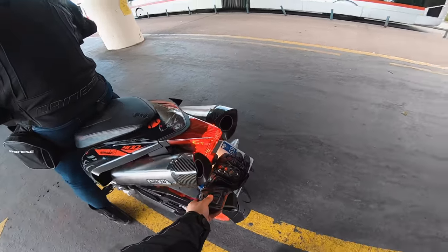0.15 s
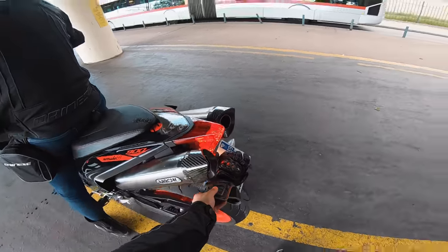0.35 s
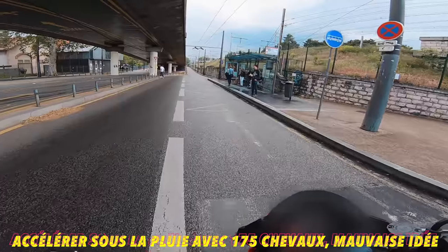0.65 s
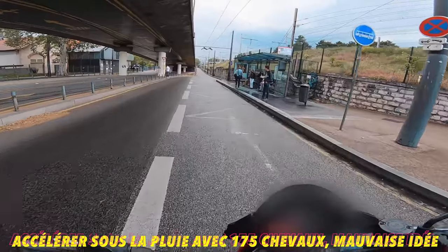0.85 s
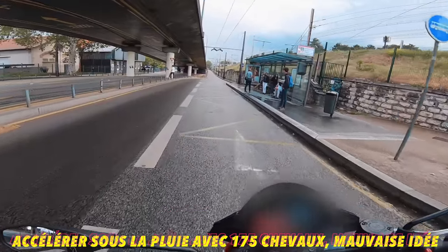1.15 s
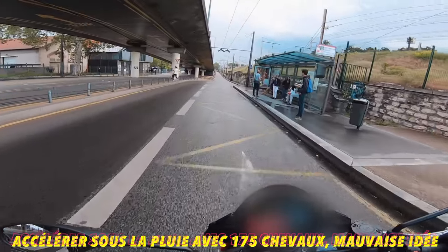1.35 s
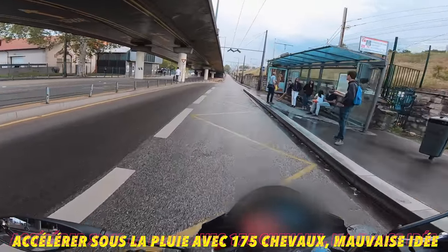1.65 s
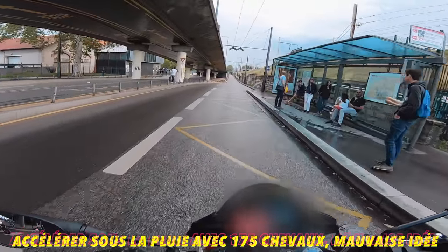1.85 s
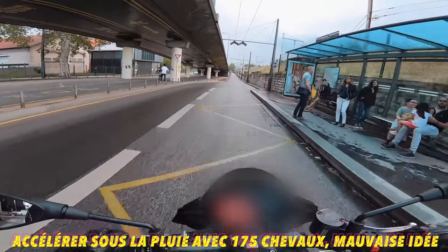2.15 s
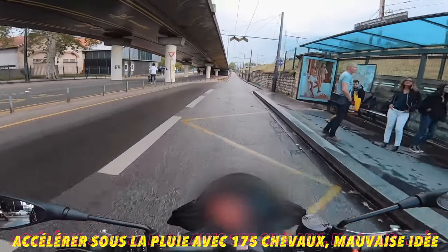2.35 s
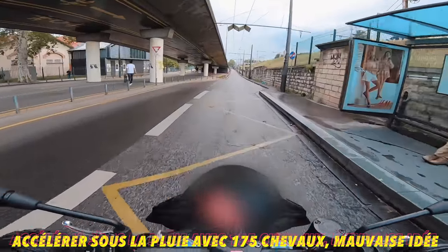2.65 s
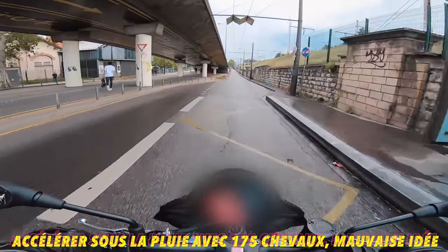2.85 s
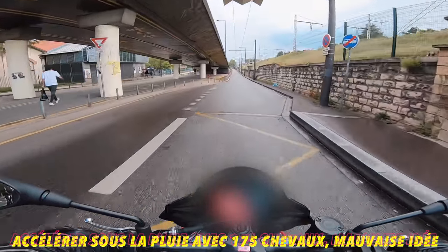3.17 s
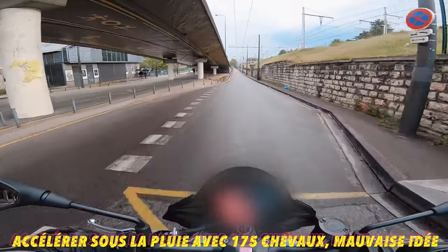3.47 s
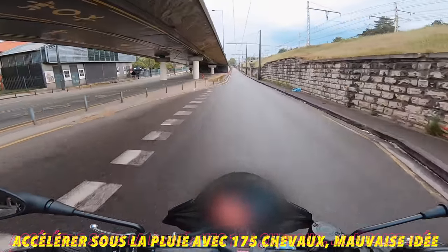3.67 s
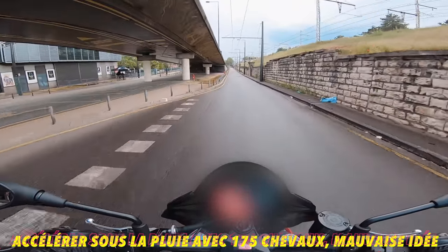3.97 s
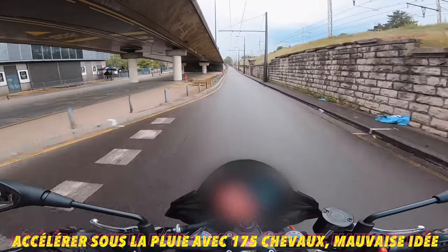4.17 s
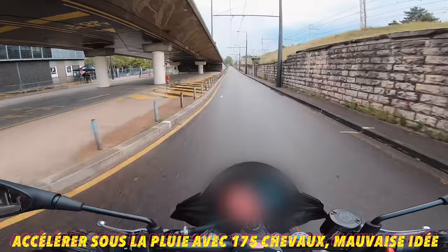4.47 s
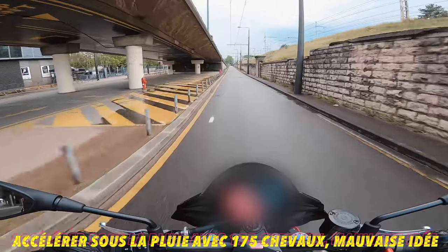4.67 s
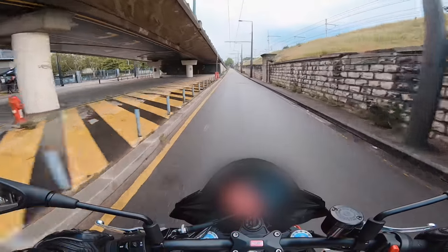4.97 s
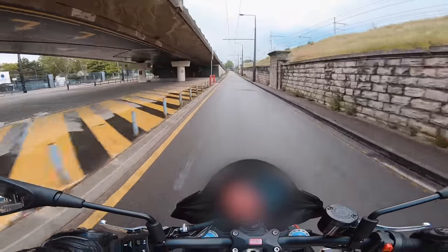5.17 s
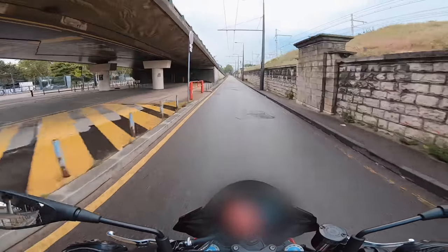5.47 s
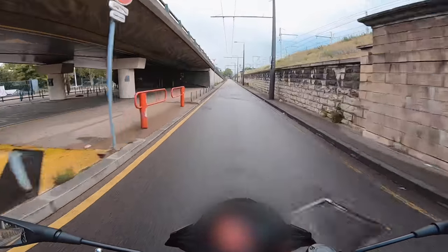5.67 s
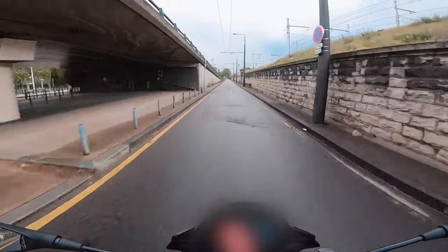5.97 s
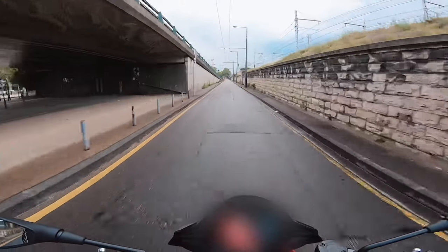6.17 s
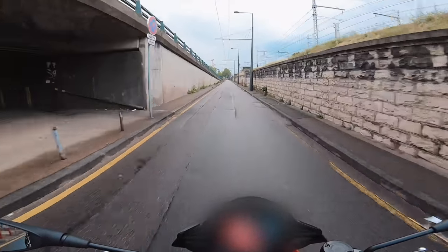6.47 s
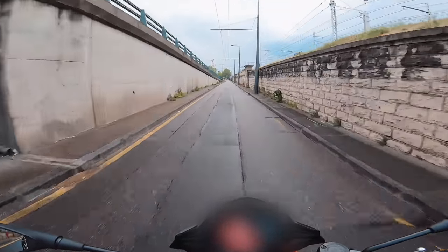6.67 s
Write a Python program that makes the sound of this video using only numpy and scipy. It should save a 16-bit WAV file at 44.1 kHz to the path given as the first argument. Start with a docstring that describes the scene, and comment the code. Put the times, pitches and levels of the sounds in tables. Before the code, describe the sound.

For the first half second a motorcycle idles close by, its lumpy beats echoing off concrete. At 0.5 seconds the sound cuts abruptly to the saddle of a four-cylinder bike pulling away on a wet road. The engine is low and ragged, with light valve ticking, while wind buffets the microphone and the tyres throw a soft hiss of spray. The revs climb steadily and the intake growls. A faint clutch hiss builds until about 2.4 seconds, and the throttle dips briefly there and near 2.9 seconds. At 3.7 seconds the exhaust opens into a louder, dense howl that keeps rising in pitch, flaring to a peak at about 5.3 seconds. The throttle then shuts and the pitch drops with an upshift around 5.5 seconds. Until the end, near 6.8 seconds, the bike coasts with a burbling exhaust, a faint gear whine and slowly sinking revs under rushing wind.

```python
"""First a motorcycle idles beside the listener, its lumpy beats echoing off concrete.
At 0.5 s, heard from the saddle, a V4 pulls away on a wet road: the clutch hisses, valves tick,
wind buffets the ears and the tyres throw spray. The revs climb and the air intake growls.
At 3.7 s a valve in the exhaust opens and the pipe howls. At 5.3 s the throttle shuts,
and after a shift up the bike coasts with a burbling pipe and whining gears."""
import sys
import numpy as np
from scipy import signal
from scipy.fft import rfft, irfft, next_fast_len
from scipy.io import wavfile
from scipy.ndimage import uniform_filter1d, minimum_filter1d, map_coordinates

SR = 44100
rng = np.random.default_rng(int(sys.argv[2]) if len(sys.argv) > 2 else 0)


def wav_out(sig):
    """Save sig, one row per channel (or a flat mono array), as 16-bit PCM at SR to the path in sys.argv[1]."""
    wavfile.write(sys.argv[1], SR, np.round(np.clip(np.atleast_2d(sig).T, -1, 1) * 32767).astype(np.int16))


N = 300919

# engine speed, in cycles of two crank turns: t/s, f/Hz
REVS = [(.48, 17.85), (1.3, 18.8), (1.57, 20.1), (1.72, 21.8), (1.9, 23.1), (2.1, 26.15), (2.29, 28.6),
        (2.43, 28.85), (2.9, 33.9), (3.2, 37.1), (3.55, 41.2), (3.9, 47), (4.3, 55), (4.71, 62.9),
        (5.03, 69.2), (5.19, 73.9), (5.27, 78.6), (5.35, 88.2), (5.39, 90.6), (5.43, 85), (5.505, 68.8),
        (5.67, 74.3), (5.92, 69.6), (6.05, 70.65), (6.82, 63.25)]
def revs():
    """The engine turns: its running count of cycles, and its speed in cycles a second."""
    speed, = curves(REVS)
    cycle = np.cumsum(speed) / SR
    return cycle - cycle[round(2.094 * SR)] % 1 + 1, speed


# how hard the engine pulls: t/s, level/dB
PULL = [(.5, -13.5), (1.3, -7.5), (2.2, -2), (3.1, 0.5), (3.33, -1), (3.43, 2), (3.68, 4), (4.2, 2),
        (4.7, -6), (5.24, -5), (5.45, -8), (6.82, -22)]
# brief lifts of the throttle, the last for the shift: t/s, half length/s, drop/dB
THROTTLE_LIFTS = [(2.46, 0.093, 7), (2.93, 0.049, 3.5), (5.47, 0.056, 13)]
VALVE_OPENS_S, SHUT_S, SHUT_TAKES_S = 3.7, 5.345, .05  # exhaust valve opens; throttle shuts
def throttle():
    """The load in dB, how far the exhaust valve is open, and how far the bike is coasting."""
    load_db = curves(PULL)[0] - bells(THROTTLE_LIFTS)
    return load_db, switch(VALVE_OPENS_S, .026), switch(SHUT_S, SHUT_TAKES_S)


# the four unevenly timed cylinders: firing angle/degrees, exhaust level/dB, intake level/dB
FOUR_CYLINDERS = [(0, 2, 0), (117.4, 0.5, -2), (289.1, 5.5, 2), (534.1, 1.5, 1.5)]
ANGLES, EXHAUST_DB, INTAKE_DB = np.transpose(FOUR_CYLINDERS)
def firings(cycle, cylinder_db, scatter_db, jitter_deg):
    """One sharp pulse per firing, each a little different in strength and timing."""
    train = np.zeros(N)
    for angle, db in zip(ANGLES, cylinder_db):
        fires_at = angle + jitter_deg * chance(cycle)
        gap = (cycle - fires_at / 720 + .5) % 1 - .5
        pulse = (161 * np.sinc(161 * gap) - 11 * np.sinc(11 * gap)) / np.sinc(gap)  # tones 6 to 80
        train += amp(db + scatter_db * chance(cycle)) * pulse
    return train


def puffs(cycle, cylinder_db, length):
    """Swirling gas bursts out at each firing and fades; length is a share of the cycle."""
    bursts = sum(amp(db) * np.exp(-((cycle - angle / 720) % 1) / length)
                 for angle, db in zip(ANGLES, cylinder_db))
    return bursts * noise()


def raggedness(speed):
    """Fuel burns unevenly at low revs and more smoothly as they rise."""
    return np.interp(speed, [19, 28, 37, 43, 50], [.8, .55, .48, .26, .16])


# exhaust tones with the valve shut: multiple of engine speed, level/dB
BOOM_TONES = [(1, -11), (3, 2.5), (4, -4), (5, 1)]
# how the shut pipe favours some pitches: f/Hz, level/dB
BOOM_RESONANCES = [(20, -32), (55, -43.5), (82, -28.5), (112, -32.5), (140, -21), (165, -24), (205, -34)]
def boom(cycle, speed):
    """Deep tones swell and fade as the revs carry them through the shut pipe's resonances."""
    tones = engine_tones(cycle, BOOM_TONES, lambda k: along(BOOM_RESONANCES, k * speed), waver_db=0)
    # held back while the clutch slips, firmer once it grips
    grip_db = np.interp(speed, [20, 23, 25.7, 26.6, 30], [0, -4, -7, 2, 1])
    return amp(grip_db - .77 * bells(THROTTLE_LIFTS)) * tones


# exhaust tones with the valve open: multiple of engine speed, pulling level/dB, coasting level/dB
HOWL_TONES = [(1, -8, -26), (2, -12, -8.5), (3, 10.5, 5), (4, 8.5, 12), (5, 5.5, 7.5), (6, -18.5, -7),
              (7, 4, -7), (8, 7.5, -2.5), (9, -3, -23), (10, -0.5, -32), (11, 0.5, -18), (12, 4, -14),
              (13, -9.5, -14), (14, -3.5, -4), (15, -4, -18)]
# how the open pipe favours some pitches: f/Hz, level/dB
HOWL_RESONANCES = [(43, -18), (55, -13), (70, -20.5), (100, -27.5), (140, -30.5), (175, -39.5),
                   (200, -31.5), (225, -28.5), (262, -28), (290, -31.5), (325, -32.5), (360, -30),
                   (400, -27), (445, -28.5), (480, -42), (550, -31.5), (610, -23), (660, -30.5),
                   (720, -28.5), (780, -39.5), (860, -43.5)]
# deep tones surge as the valve opens and at peak revs: t/s, half length/s, rise/dB
DEEP_SURGES = [(3.75, 0.13, 6.5), (5.33, 0.055, 3.5)]
def howl(cycle, speed):
    """The four uneven firings run together in the open pipe into one dense howl."""
    def phase(k):
        fired = sum(amp(db) * np.exp(-1j * k * np.radians(angle / 2))
                    for angle, db in zip(ANGLES, EXHAUST_DB))
        return np.angle(-fired) - 1.11 * k * k - 2 * np.pi * k * .54  # the pipe smears and delays

    _, _, coast = throttle()
    blend = []
    for k, pulling_db, coasting_db in HOWL_TONES:
        closed = switch(SHUT_S - .014 * (k - 4), SHUT_TAKES_S)  # higher tones change sooner
        surge_db = bells(DEEP_SURGES) * np.exp(-((k * speed - 225) / 75) ** 2)  # around 225 Hz
        blend.append((k, (1 - closed) * pulling_db + closed * coasting_db + surge_db))
    # the beat stumbles just after the valve opens and again while coasting
    uneven = np.interp(speed, [44, 51], [.65, .35]) + .7 * coast
    stumbling = cycle + .008 * uneven * chance(cycle)
    tones = engine_tones(stumbling, blend, lambda k: along(HOWL_RESONANCES, k * speed),
                         waver_db=1.8 * uneven, phase=phase)
    return amp(-.45 * bells(THROTTLE_LIFTS)) * tones


# exhaust beats at idle: t/s, level/dB
IDLE_BEATS = [(.006, -2), (0.027, -2.5), (0.06, -10.5), (0.078, -2.5), (0.112, -3.5), (0.135, -11),
              (0.17, -9), (0.194, -2.5), (0.233, -3), (0.255, -18.5), (0.3, -2.5), (0.327, -4.5),
              (0.368, -3), (0.397, -6.5), (0.444, -2), (0.473, -15.5)]
# the silencer's tone from behind: f/Hz, level/dB
SILENCER_TONE = [(25, -11), (55, 4.5), (105, 2.5), (195, 1.5), (240, -2.5), (305, -17.5), (385, -6),
                 (480, -15.5), (580, -19), (700, -33), (800, -25.5), (950, -29), (1300, -65), (3000, -63.5),
                 (8000, -78)]
def idle():
    """Lumpy beats leave a standing bike's silencer and echo off concrete, over a faint street hum."""
    beats = np.zeros(N)
    for s, db in IDLE_BEATS:
        beats[round(s * SR)] = -amp(db)
    direct = coloured(beats, SILENCER_TONE)
    echo = echoes(direct, SR // 2, fade_s=.5)
    street = unit(coloured(noise(), [(50, 1), (200, 5.5), (1200, -23.5), (1900, -27.5), (2300, -28),
                                     (2800, -33.5), (5000, -44.5), (8000, -59), (15000, -61)]))
    return amp(-4) * (direct + amp(-4) * echo) / np.abs(direct).max() + amp(-32) * street


# the pipe's muffled tone with its valve shut: f/Hz, level/dB
DRONE_TONE = [(90, -9.5), (135, 14), (195, -1.5), (245, 2.5), (330, -9.5), (400, 0.5), (470, -3.5),
              (560, -19.5), (750, -20.5), (1000, -47.5)]
# gas rushing through the open pipe: f/Hz, level/dB
RASP_TONE = [(40, -37.5), (100, -17), (200, 2.5), (290, -11), (400, -17), (480, -10.5), (620, 4.5),
             (800, 0.5), (1100, -29.5), (5000, -90)]
def pipe(cycle, speed, pulses):
    """Firing pulses drone in the shut pipe; once it opens, gas rasps out, louder under load."""
    load_db, valve, _ = throttle()
    drone_db = -23 + np.interp(speed, [17.6, 23, 16.6, 36], [1, -4, -6, -2])
    drone = amp(drone_db) * steady(coloured(pulses, DRONE_TONE))
    gas = puffs(cycle, EXHAUST_DB, length=.24)
    rasp = amp(-33 + .94 * load_db) * steady(coloured(gas, RASP_TONE))
    return (1 - valve) * drone + valve * rasp


# the pipe's tone while coasting: f/Hz, level/dB
BURBLE_TONE = [(40, -28), (95, 1), (160, -4.5), (240, -13.5), (310, -9.5), (345, 4), (400, -7), (480, -20),
               (900, -61), (4000, -93)]
def burble(cycle, speed):
    """Unburnt fuel burbles in the pipe on a shut throttle, more as the revs sink."""
    _, _, coast = throttle()
    db = np.interp(speed, [65, 75], [-20.5, -25.5])
    return coast * amp(db) * steady(coloured(puffs(cycle, EXHAUST_DB, length=.45), BURBLE_TONE))


def bark(cycle, speed):
    """One short thud per cycle while the engine labours at low revs."""
    load_db, _, _ = throttle()
    db = np.interp(speed, [22, 24.95, 27.9, 31, 32.14, 35.8], [-39.5, -17.5, -19.5, -49, -21, -62])
    thuds = firings(cycle - .01, [0], scatter_db=1.5, jitter_deg=4)
    return amp(load_db + db) * steady(band(resonate(thuds, [(533, 165, 0)]), 280, 530, order=5))


# the ring of the box the engine breathes through: f/Hz, width/Hz, level/dB
AIRBOX_RING = [(635.6, 140, 0.5)]
# the intakes take turns to gulp hardest: engine speed/Hz, then level/dB for each cylinder
GULP_STRENGTHS = [(18, 0, -9, -8, -7), (21, 0, -7, -8, -3), (25, 0, -13, -12, -10),
                  (28.4, 0, -13, -12, -10), (29, 0, -6, -4, -3), (31.5, 0, -11, -8, -13),
                  (33, 0, -11, -8, -13), (35, -4, -2, -3, -4), (36.3, -6, -6, -7, 0), (38.4, -4, -5, -6, 0),
                  (39.6, 0, -9, -20, -20), (44, 0, -9, -20, -20), (45.5, 0, 0, 0, 0)]
def airbox(cycle, speed):
    """Each cylinder gulps air ahead of its exhaust beat, making the airbox growl."""
    def ring(x):
        return steady(band(resonate(resonate(x, AIRBOX_RING), AIRBOX_RING), 330, 638, order=6))

    load_db, _, _ = throttle()
    ragged = raggedness(speed)
    stroke = cycle + np.interp(speed, [19, 23, 27, 32, 40], [.08, .07, .03, .1, .19])
    speeds, *strengths = np.transpose(GULP_STRENGTHS)
    gulp_db = [db + np.interp(speed, speeds, more) for db, more in zip(INTAKE_DB, strengths)]
    gulps = steady(firings(stroke, gulp_db, scatter_db=.6 + .9 * ragged, jitter_deg=7 * ragged))
    # over a narrow range of revs each gulp bounces back along the duct, 5 ms later
    bounce = np.interp(speed, [38.4, 39.6, 44, 45.5], [0, 1, 1, 0])
    gulps = gulps + .65 * bounce * np.roll(gulps, round(.005 * SR))
    breath = ring(puffs(stroke, gulp_db, length=.35))
    growl = ring(gulps) + ragged * (.85 - .4 * bounce) * breath
    calm_db = -21.5 * switch(VALVE_OPENS_S + .025, .05)  # quieter once the exhaust valve opens
    return amp(-19.5 + load_db + calm_db) * steady(growl)


# the ring of the engine cases and bodywork: f/Hz, width/Hz, level/dB
CASE_RING = [(1160, 155, -3), (1352, 130, 3.5), (1680, 460, -6), (2179, 98, -1), (2408, 63, -1),
             (3120, 300, -18.5), (3750, 107, -9), (5100, 650, -15.5), (5580, 520, -17)]
# the treble dips briefly: t/s, half length/s, drop/dB
TREBLE_DIPS = [(3.62, 0.17, 6.5), (4.25, 0.29, 5), (5.24, 0.051, 4.5), (5.53, 0.11, 4)]
def clatter(cycle, speed, pulses):
    """Firings shake the cases: a loose rattle tightens into a snarl as the revs rise."""
    load_db, _, _ = throttle()
    revs_db = np.interp(speed, [15.4, 20.6, 51, 74, 150], [-22, -5, -1, 1.5, -1])
    db = -28.5 + .51 * load_db - bells(TREBLE_DIPS) + revs_db
    rattle = steady(resonate(puffs(cycle, EXHAUST_DB, length=.26), CASE_RING))
    snarl = steady(band(resonate(pulses, CASE_RING), 650, 4000))
    tightness = np.interp(speed, [20, 40, 55], [.5, .9, 1.7])
    return amp(db) * steady(band(metal(rattle + tightness * snarl, fade_s=.23), 630, 6300, order=6))


# tones the crank sings at high revs: multiple of engine speed, level/dB
CRANK_SONG_TONES = [(16, 4), (17, -2), (18, 4.5), (20, -4), (21, -4), (23, 2), (24, 11.5), (25, 2.5), (26, -1),
                    (27, -3), (29, 4.5), (34, -2.5), (36, 3.5), (37, -1)]
def crank_song(cycle, speed):
    """The crank sings through the cases near the top of the revs, until the throttle shuts."""
    _, valve, _ = throttle()
    singing = valve * (1 - switch(SHUT_S + .07, .08))
    db = np.interp(speed, [45, 58, 65, 75, 88], [-37, -35, -30.5, -29.5, -33])
    tones = engine_tones(cycle, CRANK_SONG_TONES, lambda k: 3 * wobble(7), waver_db=2)
    return singing * amp(db) * steady(resonate(tones, CASE_RING))


# the ring of the engine's valves: f/Hz, width/Hz, level/dB
VALVE_RING = [(1460, 137, 7.5), (1716, 250, 1), (3134, 30, -5.5), (4640, 200, -10), (4980, 70, -12)]
def valve_ticks(cycle, speed):
    """The engine's valves tick in step with the firings."""
    taps = metal(puffs(cycle, EXHAUST_DB, length=.52), fade_s=.16)
    db = np.interp(speed, [19, 30, 45], [-40.5, -39.5, -47])
    return amp(db) * steady(band(resonate(taps, VALVE_RING), 880, 4900))


# the ring of the engine covers: f/Hz, width/Hz, level/dB
COVER_RING = [(1338, 32, 5), (2420, 78, -6.5), (2800, 72, -24.5), (3210, 45, -10.5), (5000, 240, -19)]
# the ring of one panel: f/Hz, width/Hz, level/dB
PANEL_RING = [(2170, 55, 0)]
def covers(cycle, speed):
    """Firings ring the engine covers at middle revs, and one panel at the very top."""
    def strike(rings):
        return steady(resonate(puffs(cycle, EXHAUST_DB, length=.2), rings))

    cover_db = np.interp(speed, [17, 28, 43, 27, 39, 51], [-55.5, -38.5, -33, -37, -32.5, -44.5])
    panel_db = np.interp(speed, [70, 74, 82], [-65, -44, -35.5]) - 30 * switch(5.46, .08)
    cover = amp(cover_db - bells(THROTTLE_LIFTS)) * strike(COVER_RING)
    return cover + amp(panel_db) * strike(PANEL_RING)


def mounts(speed):
    """The engine rocks on its mounts, humming two low notes that fade as the revs rise."""
    db = np.interp(speed, [15, 16, 23.1, 23.3, 38], [-21, -22, -22.5, -31, -53])
    t = np.arange(N) / SR
    hum = sum(amp(db + note_db + .44 * wobble(10)) * np.sin(2 * np.pi * hz * t + .73 * wobble(4.4))
              for hz, note_db in [(53, .5), (80, -6.5)])
    return np.sqrt(2) * hum


# tones of the gear teeth: multiple of engine speed, level/dB
GEAR_TONES = [(20, -7), (22, 3.5), (24, 4), (30, -2), (34, 5.5), (35, 3.5), (36, 7), (40, 11)]
def gears(cycle):
    """Gear teeth whine through the cases as the wheel drives the engine after the shift."""
    whine = sum(amp(db + 3.5 * wobble(7.8)) * np.sin(2 * np.pi * round(k) * cycle + .35 * wobble(30))
                for k, db in GEAR_TONES)
    return switch(5.52, .43) * amp(-35.5) * steady(resonate(whine, CASE_RING))


# tones of the gear on the crank: multiple of the rate its teeth meet, level/dB
CRANK_GEAR_TONES = [(1, 1), (2, -16.5), (3, -18.5)]
def crank_gear(cycle, speed, teeth_per_cycle=89):
    """This gear whines at low revs, fluttering with the lumpy turn of the crank."""
    phase = 2 * np.pi * teeth_per_cycle * cycle + 1.1 * np.sin(2 * np.pi * cycle)
    phase += 2.6 * chance(4 * cycle)
    whine = sum(amp(db + 3.5 * wobble(12)) * np.sin(round(k) * phase) for k, db in CRANK_GEAR_TONES)
    db = np.interp(speed, [18, 20, 24, 28, 32], [-45.5, -45.5, -47, -58, -110])
    return band(amp(db) * unit(whine), 800, 4900, order=8)


# the ring of the clutch plates: f/Hz, width/Hz, level/dB
PLATE_RING = [(4580, 84, -2.5), (5000, 100, -2), (5440, 100, -5), (6440, 320, -11.5)]
def clutch(slips_s=1, grips_s=2.44):
    """The slipping plates hiss ever louder until they grip."""
    slipping = switch(slips_s, .1) - switch(grips_s, .036)
    db = -45.5 + 24 * (np.arange(N) / SR - grips_s) + 1.9 * wobble(22)
    return slipping * amp(db) * unit(band(resonate(noise(), PLATE_RING), 3500, 7500))


# gusts hitting the listener: t/s, level/dB
WIND_GUSTS = [(.5, -33.5), (1.1, -30), (2, -53), (3.1, -24.5), (3.7, -26), (4.3, -32), (4.6, -29.5),
              (5.4, -24.5), (6.2, -26.5), (6.82, -38)]
# their low rumble: f/Hz, level/dB
GUST_TONE = [(3, -34), (10, 4), (18, -4.5), (30, 14), (46, -7.5), (80, -3), (160, -17), (400, -59)]
def gusts():
    """Lumps of wind buffet the listener."""
    return amp(curves(WIND_GUSTS)[0] + wobble(15)) * unit(coloured(noise(), GUST_TONE))


# wind and spray grow with pace: first-gear engine speed/Hz, wind level/dB, spray level/dB
ROAD_LEVELS = [(16.9, -29, -60.5), (27.5, -21, -51.5), (51.6, -20, -49), (73.4, -19, -44)]
# rushing air: f/Hz, level/dB
WIND_TONE = [(30, 4.5), (70, 2), (140, -2.5), (300, -8.5), (600, -11.5), (900, -19.5), (1500, -20),
             (2500, -21.5), (4000, -38), (6000, -49), (7500, -59), (15000, -87)]
# hissing water: f/Hz, level/dB
SPRAY_TONE = [(1000, -16), (3000, 5.5), (6000, 4), (7500, -11), (11500, -10.5), (15500, -15.5)]
# wetter and drier patches of road: t/s, half length/s, change/dB
WET_PATCHES = [(.8, 0.2, 2), (2.8, 0.31, 1), (3.96, 0.11, 3.5), (4.92, 0.078, 1), (5.35, 0.05, -4)]
def wind_and_spray(speed):
    """Air rushes round the rider and the tyres fling water, both growing with road speed."""
    pace = np.maximum.accumulate(speed)  # road speed holds after the shift
    paces, wind_levels, spray_levels = np.transpose(ROAD_LEVELS)
    wind_db = np.interp(pace, paces, wind_levels) - .32 * bells(TREBLE_DIPS)
    wind = amp(wind_db + 1.1 * wobble(14)) * unit(coloured(noise(), WIND_TONE))
    spray_db = np.interp(pace, paces, spray_levels) + bells(WET_PATCHES) - bells(TREBLE_DIPS)
    flicker_db = .85 * wobble(150) + .61 * wobble(25)
    return wind + amp(spray_db + flicker_db) * unit(coloured(noise(), SPRAY_TONE))


# puddles that throw up mist: t/s, half length/s, rise/dB
MIST_PUDDLES = [(.8, .3, 13), (1.8, .2, 10), (2.62, .15, 15), (3.1, .3, 15)]
def mist():
    """Tiny droplets add a thin, flickering fizz above the spray."""
    db = -84.5 + bells(MIST_PUDDLES) + 1.5 * wobble(40)
    return amp(db) * unit(band(noise(), 9500, 15000, order=6))


def engine_tones(cycle, table, level_db, waver_db, phase=lambda k: -.135 * k * k):
    """Tones at k times the engine speed; the default phase smears each cycle's burst."""
    tones = np.zeros(N)
    for multiple, db in table:
        k = round(multiple)
        gain = amp(db + level_db(k) + waver_db * chance(cycle))
        tones += gain * np.cos(2 * np.pi * k * cycle + phase(k))
    return np.sqrt(2) * tones


def metal(x, fade_s):
    """The frame's many small resonances add a metallic colour."""
    return x + .35 * echoes(x, SR // 8, fade_s)


def echoes(x, samples, fade_s):
    """A dense tail of echoes that falls at 60 dB per fade_s."""
    t = np.arange(samples) / SR
    tail = rng.standard_normal(samples) * amp(-60 * t / fade_s)
    return signal.fftconvolve(x, tail / np.linalg.norm(tail))[:N]


def amp(db):
    """Turn decibels into a gain."""
    return 10 ** (np.asarray(db) / 20)


def unit(x):
    """Scale to an average power of 1."""
    return x / np.sqrt(np.mean(x ** 2) + 1e-20)


def steady(x):
    """Even out slow changes in level, keeping the single beats."""
    power = uniform_filter1d(uniform_filter1d(x * x, size=4800), size=3600)
    return x / np.sqrt(np.abs(power) + 1e-12)


def curves(rows):
    """Join timed points with straight lines, one curve per column."""
    times, *columns = np.transpose(rows)
    return [np.interp(np.arange(N) / SR, times, column) for column in columns]


def along(points, hz):
    """Read the level at a pitch from (f/Hz, level/dB) points."""
    f, db = np.transpose(points)
    return np.interp(np.log(hz + 1), np.log(f), db)


def switch(at_s, takes_s):
    """A ramp from 0 to 1 centred on a moment."""
    return np.clip((np.arange(N) / SR - at_s) / takes_s + .5, 0, 1)


def bells(rows):
    """Smooth bumps from (t/s, half length/s, size/dB) rows."""
    return sum(db * np.exp(-((np.arange(N) / SR - s) / half) ** 2) for s, half, db in rows)


def chance(position):
    """A smooth random curve with a new value at each whole position."""
    coarse = map_coordinates(rng.standard_normal(4096), [position[::16]], mode="mirror")
    return np.interp(np.arange(N), np.arange(N)[::16], coarse)


def wobble(rate):
    """A smooth random curve with `rate` new values a second."""
    return chance(np.arange(N) * rate / SR)


def noise():
    """White noise."""
    return rng.standard_normal(N)


def filtered(x, response):
    """Scale each frequency in x by response(f)."""
    size = 2 * next_fast_len(N // 2 + SR // 4)
    return irfft(rfft(x, size) * response(np.fft.rfftfreq(size, 1 / SR)), size)[:N]


def coloured(x, points):
    """Shape the tone by (f/Hz, level/dB) points, ringing only after each sound."""
    def response(hz):
        cepstrum = irfft(np.log(amp(along(points, hz))))
        cepstrum[1:len(hz) - 1] *= 2
        cepstrum[len(hz):] = 0
        return np.exp(rfft(cepstrum))
    return filtered(x, response)


def resonate(x, rings):
    """Let x ring resonances given as (f/Hz, width/Hz, level/dB)."""
    return filtered(x, lambda f: sum(
        (-1) ** k * amp(db) * 1j * f * width / (hz * hz - f * f + 1j * f * width)
        for k, (hz, width, db) in enumerate(rings)))


def band(x, low_hz, high_hz, order=4):
    """Keep what lies between two frequencies."""
    power = 2 * order
    return filtered(x, lambda f: ((1 + (low_hz / (f + 1)) ** power) * (1 + (f / high_hz) ** power)) ** -.5)


def scene():
    """One bike's standing idle gives way suddenly to a ride on a V4."""
    cycle, speed = revs()
    howling = switch(3.695, .12)  # the howl swells in as the exhaust valve swings
    ride = (1 - howling) * boom(cycle, speed) + howling * howl(cycle, speed)
    ragged = raggedness(speed)
    pulses = steady(firings(cycle, EXHAUST_DB, scatter_db=.6 + 2.5 * ragged, jitter_deg=.3 + ragged))
    ride += pipe(cycle, speed, pulses) + burble(cycle, speed) + airbox(cycle, speed)
    ride += clatter(cycle, speed, pulses) + valve_ticks(cycle, speed) + bark(cycle, speed)
    ride += mounts(speed) + clutch() + gusts() + wind_and_spray(speed)
    ride += gears(cycle) + crank_gear(cycle, speed) + crank_song(cycle, speed)
    ride += covers(cycle, speed) + mist()
    riding = switch(.482, .0046)
    return ((1 - riding) * idle() + riding * ride)[None]


def record(dry):
    """Turn down the loudest peaks, fade the last instant and cut the very highest treble."""
    needed = np.minimum(1, .72 / (np.abs(dry[0]) + 1e-9))
    gain = uniform_filter1d(minimum_filter1d(needed, size=400), size=400)
    gain *= 1 - switch(N / SR - .002, .004)
    return filtered(dry[0] * gain, lambda hz: hz < 15750)[None]


dry = scene()
out = record(dry)
wav_out(out)
```